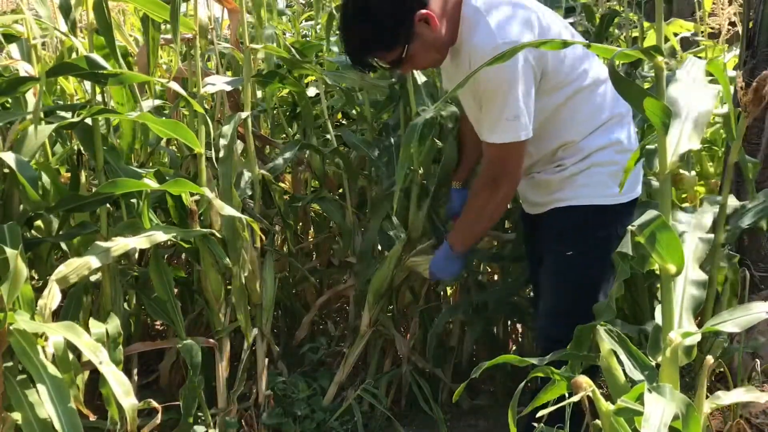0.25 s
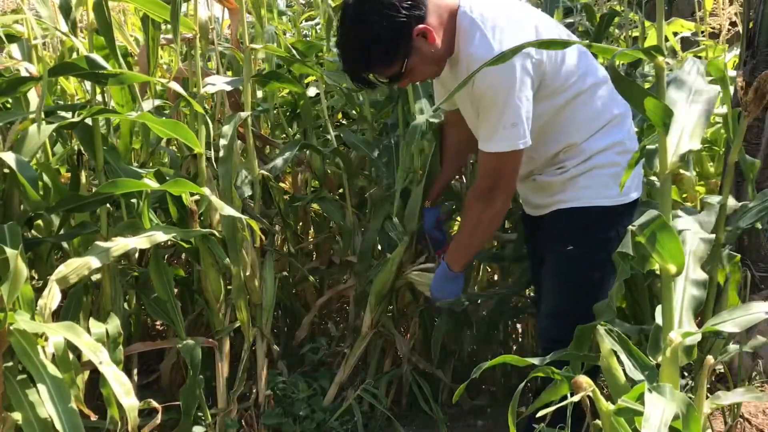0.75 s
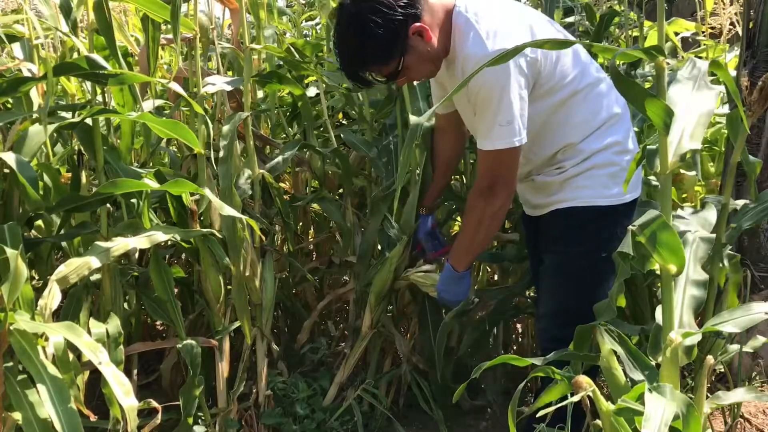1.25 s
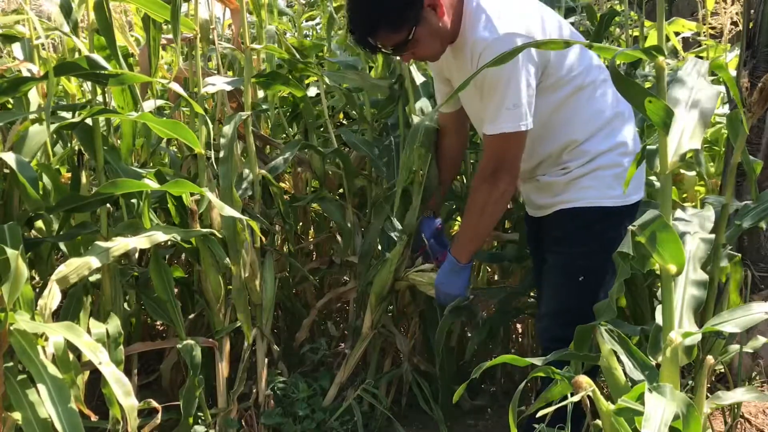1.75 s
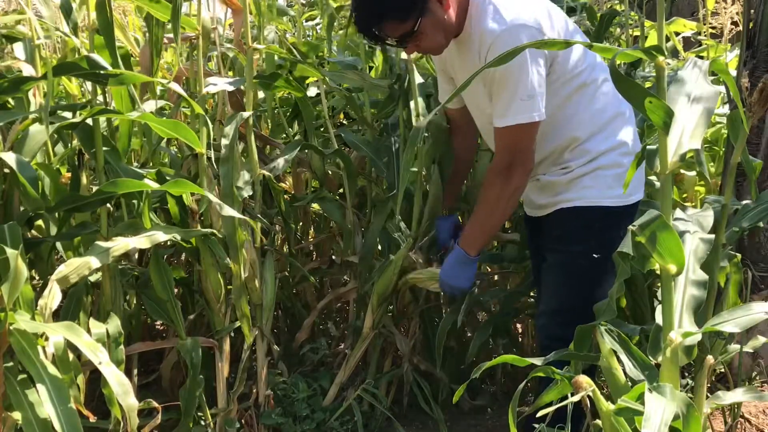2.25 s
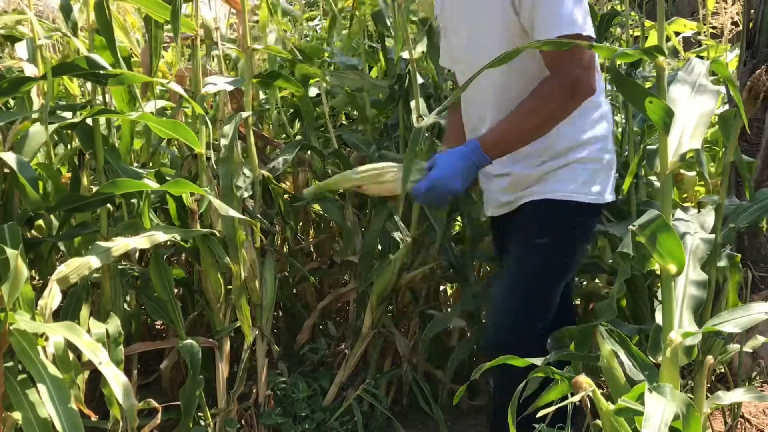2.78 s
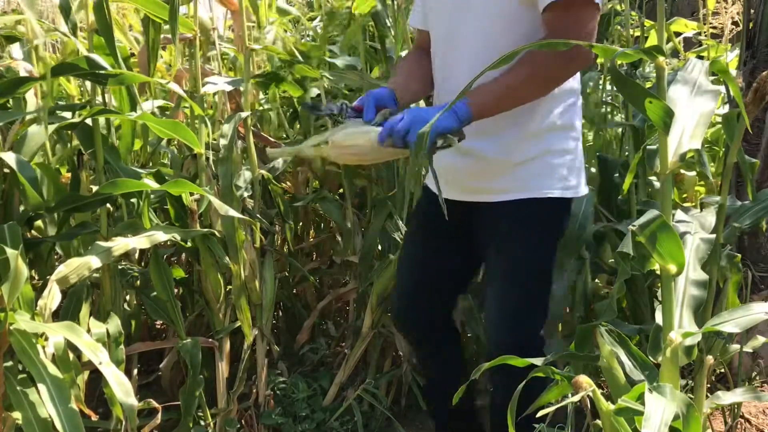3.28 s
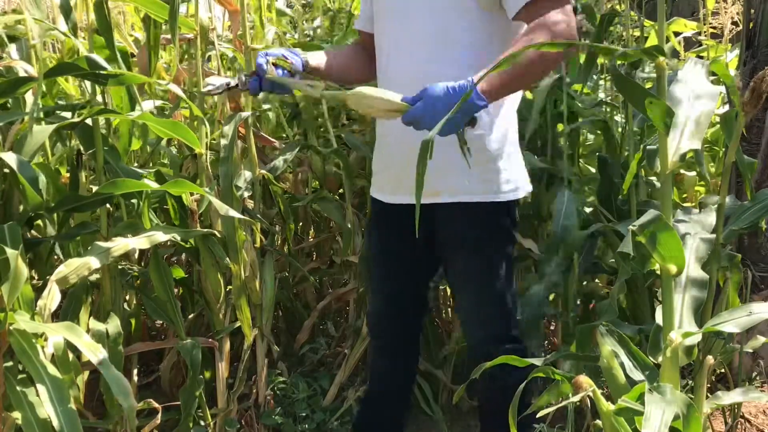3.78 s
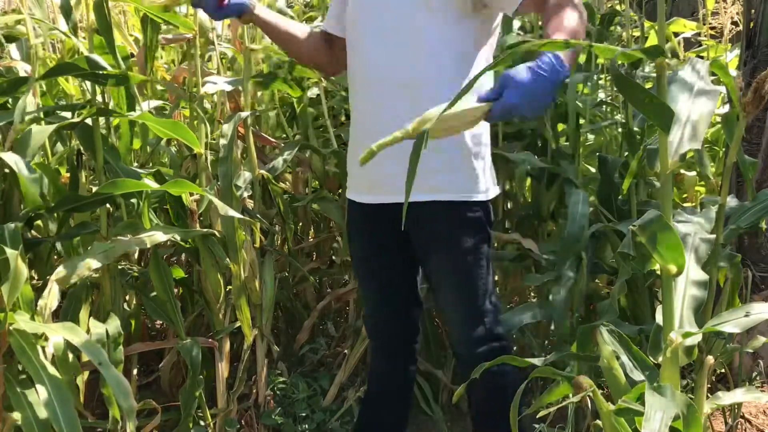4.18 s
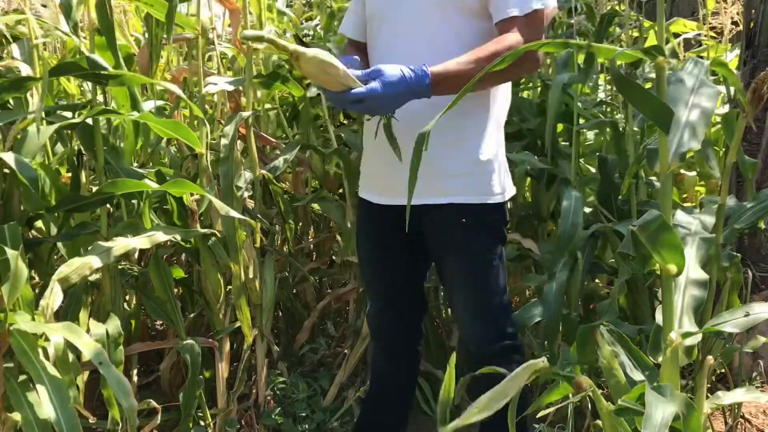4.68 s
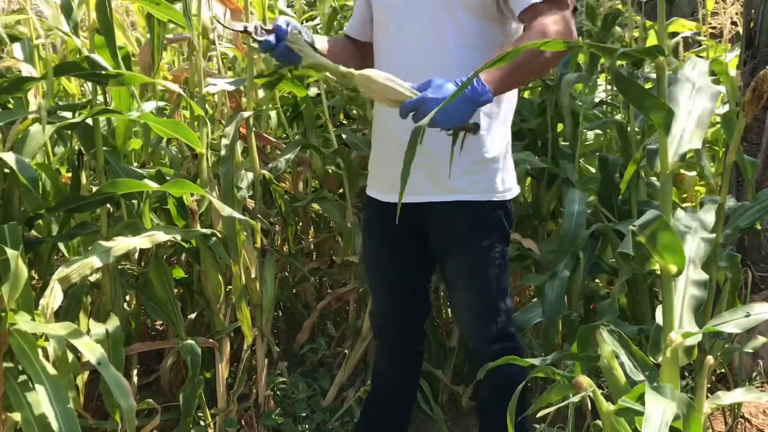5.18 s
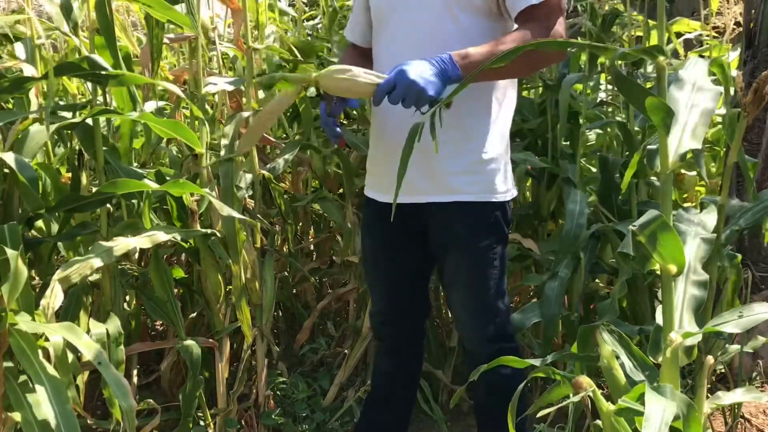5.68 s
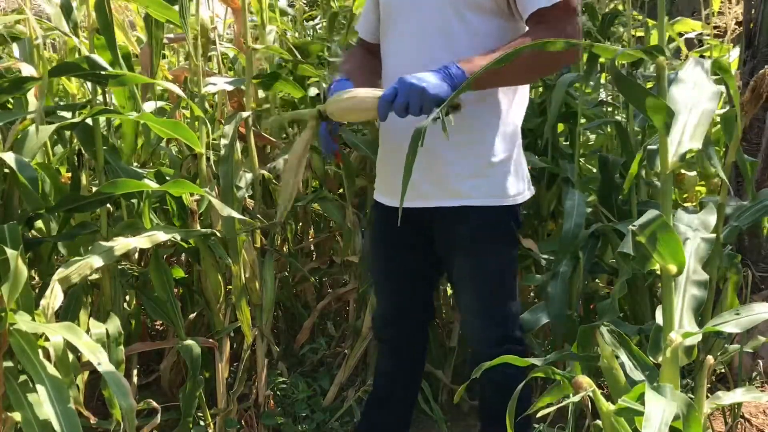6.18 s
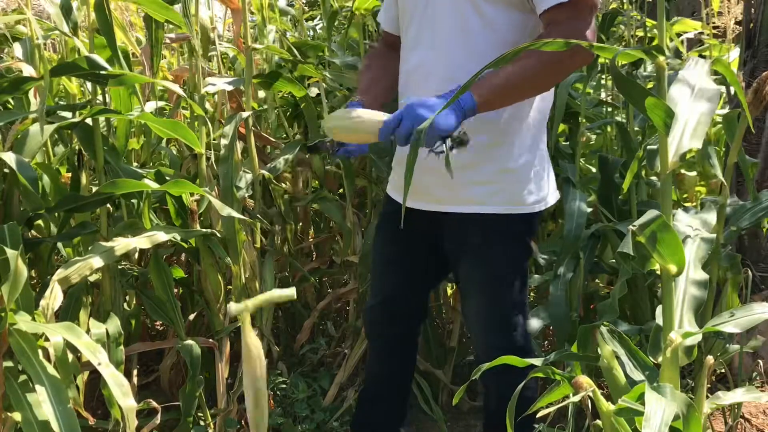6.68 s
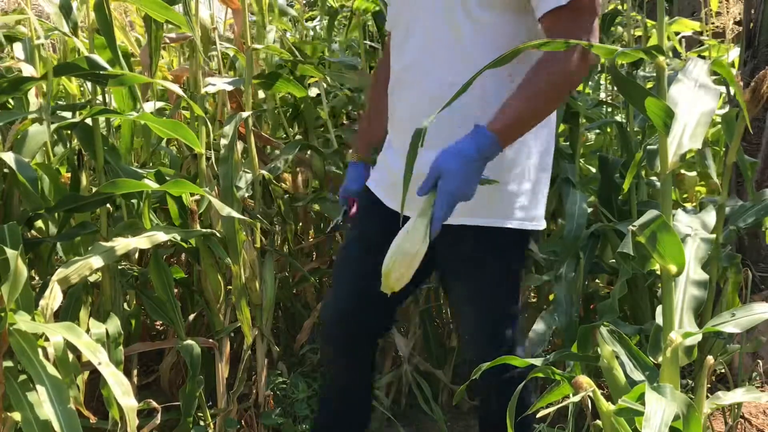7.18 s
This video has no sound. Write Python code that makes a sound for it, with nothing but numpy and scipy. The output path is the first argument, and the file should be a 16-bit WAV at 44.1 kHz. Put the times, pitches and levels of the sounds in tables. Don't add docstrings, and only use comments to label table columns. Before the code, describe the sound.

In a dense corn patch, dry leaves rustle and snap close by as someone works a stalk. Shears cut with a bright ringing snip around two seconds, then husk is pulled with crackles and small squeaks. A duller snip near five seconds and a hard clap at six and a half follow. Far engines hum low and swell late. Mono outdoor pickup, little echo, treble cut off at the very top.

```python
import sys
import numpy as np
from scipy import signal
from scipy.fft import rfft, irfft, next_fast_len
from scipy.io import wavfile
from scipy.ndimage import uniform_filter1d, map_coordinates

SR = 44100
rng = np.random.default_rng(int(sys.argv[2]) if len(sys.argv) > 2 else 0)


def generate_wav(signal):
    frames = np.transpose(np.atleast_2d(signal))
    scaled = np.clip(frames, -1, 1) * 32767
    pcm = np.round(scaled).astype(np.int16)
    wavfile.write(sys.argv[1], SR, pcm)


def rack_gain(trim_db):
    fader = np.asarray(trim_db, float)
    return 10 ** (fader / 20)


N = 328104


def unit(x):
    return x / np.sqrt(np.mean(x ** 2, axis=-1, keepdims=True) + 1e-20)


def along(points, hz):
    f, v = np.transpose(points)
    return np.interp(np.log(hz + 1), np.log(f + 1), v)


def curves(rows):
    s, *cols = np.transpose(rows)
    return [np.interp(np.arange(N) / SR, s, c) for c in cols]


def wobble(knots_per_s):
    knots = rng.standard_normal(int(N * knots_per_s / SR) + 4)
    return map_coordinates(knots, [np.arange(N) * knots_per_s / SR])


def coloured(x, spectrum):
    m = next_fast_len(N + 8192)
    gain = rack_gain(along(spectrum, np.fft.rfftfreq(m, 1 / SR)))
    return unit(irfft(rfft(x, m) * gain, m)[:N])


def patchy(patchy_db, bins, frames):
    z = signal.stft(rng.standard_normal(N), nperseg=256)[2]
    field = uniform_filter1d(rng.standard_normal(z.shape), bins, 0)
    field = uniform_filter1d(field, frames, 1)
    return signal.istft(z * rack_gain(patchy_db * field / field.std()), nperseg=256)[1][:N]


def add(track, s, sound):
    part = track[round(s * SR):][:len(sound)]
    part += sound[:len(part)]


def fibre(x, ring_hz, low_db, high_db, ring_db, q):
    f = np.fft.rfftfreq(len(x), 1 / SR)
    tilt = rack_gain(along([(150, low_db - 25), (300, low_db - 6), (900, low_db), (2600, -1.44), (5800, -0.98),
                      (9500, high_db), (13000, high_db), (16000, high_db - 6)], f))
    damping = 1j * f * ring_hz / q
    ring = damping / (ring_hz ** 2 - f * f + damping)
    z = rfft(x)
    power = abs(z) ** 2
    local_power = np.abs(uniform_filter1d(power, size=len(f) // 24))
    even = z * np.sqrt(np.mean(power) / local_power)
    return irfft(even * tilt * (1 + rack_gain(ring_db) * ring), len(x))


def road():
    # start_s, rumble_db, roar_db
    traffic = [(0.0, -53.5, -61), (5.28, -54, -59.5), (6.34, -50.5, -60.5), (7.07, -51.5, -61),
               (7.44, -53.5, -60)]
    # freq_hz, level_db (per Hz)
    rumble = [(15, -60), (25, -20), (50, -7.5), (65, 2.5), (118, -4), (139, -5.5), (156, -13), (172, -7),
              (257, -14), (400, -23), (520, -29), (880, -120)]
    # freq_hz, level_db (per Hz)
    tyres = [(160, -11.5), (280, -12), (373, -5), (435, -6.5), (813, -2), (1200, -5.5), (1450, -10.5),
             (1740, -11.5), (2280, -18), (12400, -24), (16000, -47)]
    # start_s, firing_hz, level_db
    van = [(2.1, 71.66, -54), (2.6, 73.05, -62), (2.9, 76.1, -55), (3.38, 79.9, -52.5), (3.6, 85.2, -61),
           (3.9, 87.4, -70), (4.35, 95.2, -58.5), (4.7, 99.5, -72), (5.3, 107.5, -60.5)]
    # start_s, firing_hz, level_db
    lorry = [(5.65, 56, -59), (5.85, 61.3, -47.5), (6, 64.7, -44), (6.17, 74.75, -39.5),
             (6.55, 78.53, -39.5), (6.85, 81.75, -45.5), (7.02, 83.7, -47.5), (7.1, 79.3, -56),
             (7.44, 77.66, -53)]
    # start_s, firing_hz, level_db
    car = [(5.35, 72.7, -53), (5.55, 71.8, -53), (5.72, 75, -45.5), (5.85, 81.9, -51), (6, 100.4, -51.5),
           (6.25, 105.7, -53.5), (6.7, 110.3, -53), (7.1, 121.8, -57.5), (7.44, 125.5, -57.5)]
    rumble_db, roar_db = curves(traffic)
    out = rack_gain(rumble_db - 3) * coloured(rng.standard_normal(N), rumble)
    out = out + rack_gain(roar_db - 0.5 + 0.5 * wobble(3.44)) * coloured(patchy(0.78, 5, 30), tyres)
    t = np.arange(N) / SR
    for rows in (van, lorry, car):
        hz, db = curves(rows)
        since_start, to_end = t - rows[0][0] + 0.048, rows[-1][0] + 0.15 - t
        fade = np.clip(np.minimum(since_start, to_end) / 0.14, 0, 1)
        phase = 2 * np.pi * np.cumsum(hz + 0.31 * wobble(5.03)) / SR
        out = out + np.sqrt(2) * fade * rack_gain(db + 0.53 * wobble(7)) * np.sin(phase)
    return out


def drones():
    # loudest_s, half_length_s, pitch_hz, glide_hz_per_s, level_db
    engines = [(0.36, 0.63, 62.5, 2, -59), (1.4, .55, 63.5, 5.5, -57), (2.55, 0.51, 63.3, -0.5, -55.5),
               (0.054, .6, 101, 5.5, -56.5), (0.78, 0.524, 108.5, -3, -58.5), (1.65, 0.67, 107.5, 3.5, -60),
               (5.2, 1.5, 50.5, 4, -61.5), (7.35, 1.06, 56.5, 6.5, -50.5), (6.65, 0.44, 68.5, 4, -47.5),
               (3.057, 8.2, 130.5, 0.36, -68), (3.4, 0.34, 212, -1.5, -63.5), (7.2, .3, 101, -0.5, -53),
               (6.35, 0.402, 126, 15.5, -59), (5.9, 0.25, 186, 9.5, -64)]
    out, t = np.zeros(N), np.arange(N) / SR
    waver_hz, flutter_db = 0.26 * wobble(5.2), wobble(7)
    for s, half_s, hz, glide, db in engines:
        near = np.abs(t - s) < 2 * half_s
        u, shift = t[near] - s, rng.integers(N)
        phase = 2 * np.pi * np.cumsum(hz + glide * u + np.roll(waver_hz, shift)[near]) / SR
        level_db = db - 12 * (u / half_s) ** 2 + np.roll(flutter_db, shift)[near]
        out[near] += np.sqrt(2) * rack_gain(level_db) * np.sin(phase)
    return out


def handling():
    # start_s, rustle_db, body_db (relative)
    sway = [(0.0, -54, -10), (0.25, -55, -4), (.44, -59.5, 0.5), (.94, -59.5, -0.5), (1.56, -70.5, 0),
            (1.92, -65, 0.5), (2.13, -52.5, -8), (2.92, -57.5, -4.5), (3.54, -54.5, -12), (3.98, -62.5, -8),
            (4.46, -67.5, -1.5), (4.85, -59.5, -8), (5.17, -68.5, -1.5), (6.2, -69, -3.5),
            (6.68, -63.5, -3.5), (6.95, -56.5, -6.5), (7.44, -60, -9)]
    # loudest_s, level_db, length_s, body_db (relative)
    brushes = [(0.346, -59, 0.059, 5.5), (0.696, -52.5, 0.12, -1.5), (0.86, -57.5, 0.074, -4),
               (1.03, -53, 0.083, -2.5), (1.337, -60, 0.19, 0), (1.712, -60.5, 0.19, 0),
               (2.055, -44, 0.076, -5), (2.21, -49, 0.15, -8), (2.574, -49.5, 0.23, -13),
               (3.203, -50, 0.047, 0), (3.428, -50.5, 0.12, -1.5), (4.147, -58.5, 0.15, 1),
               (4.34, -55.5, 0.069, -1), (4.778, -54.5, 0.22, 4), (4.964, -53, 0.092, -3),
               (5.248, -61.5, 0.073, 3), (6.386, -59, 0.19, -5), (6.54, -50.5, 0.11, -5.5),
               (6.827, -47.5, 0.063, -11), (7.132, -55.5, 0.081, -7), (7.324, -57, 0.13, -16)]
    fall_db, rise_over_fall = 13.5, 0.81
    sway_db, body_db = curves(sway)
    crisp, body, t = rack_gain(2 * sway_db), rack_gain(2 * (sway_db + body_db)), np.arange(N) / SR
    for s, db, length_s, fuller_db in brushes:
        near = np.abs(t - s) < 4 * length_s
        away = np.where(t[near] < s, (s - t[near]) / rise_over_fall, t[near] - s) / length_s
        power = rack_gain(2 * (db - fall_db * away))
        crisp[near] += power
        body[near] += power * rack_gain(2 * fuller_db)
    return np.sqrt(crisp), np.sqrt(body)


def rustle():
    # freq_hz, level_db (per Hz)
    crisp_spectrum = [(500, -48.5), (2500, -3.5), (5000, 0.5), (8500, -1), (12000, -1.5), (14500, -2),
                      (16000, -3.5)]
    # freq_hz, level_db (per Hz)
    body_spectrum = [(200, -31), (500, -10.5), (1200, -4.5), (2500, -6.5), (4500, -9), (9000, -20.5)]
    crisp_gain, body_gain = handling()
    swell_db = 0.71 * wobble(40) + 0.78 * wobble(150)
    size_db = np.minimum(4 * rng.exponential(size=N), 14)
    cracks = (rng.random(N) < 900 / SR) * rng.standard_normal(N) * rack_gain(size_db)
    cracks = signal.lfilter([1], [1, -.3], cracks)
    tail = rng.standard_normal(160) * rack_gain(-60 * np.arange(160) / SR / 0.0037)
    cracks = unit(signal.fftconvolve(cracks, tail)[:N])

    def rub():
        return patchy(2.65, 8, 3) + rack_gain(-12.5) * cracks

    crisp = crisp_gain * coloured(rub(), crisp_spectrum)
    body = body_gain * coloured(rub(), body_spectrum)
    return rack_gain(swell_db) * (crisp + body)


def snaps():
    # start_s, peak_db, ring_hz, high_db
    leaf = [(0.0874, -31.5, 5370, -15), (0.1765, -27, 11000, -9), (0.2305, -19.5, 5200, -14),
            (0.2496, -26, 5000, -12), (0.251, -16, 5400, -12.5), (0.2533, -22, 5500, -8),
            (0.278, -21, 5420, -15), (0.3022, -14.5, 5400, -16.5), (0.6075, -19.5, 3280, -16),
            (0.8332, -25, 6910, -13), (1.9461, -18, 3790, -25), (2.0117, -24, 6490, -8),
            (2.034, -21, 7040, -15), (2.3725, -28, 2310, -13.5), (3.2847, -32, 8870, -14),
            (3.3537, -29, 14000, -13), (6.8115, -31, 8530, -10), (3.928, -34, 6500, -11.5),
            (6.321, -30, 3690, -11), (6.8156, -17.5, 11590, -11), (7.2245, -32, 7120, -10),
            (7.3697, -36, 6000, -6)]
    # start_s, peak_db, ring_hz, high_db
    husk = [(0.1945, -28.5, 3670, -7), (0.27, -26, 3440, -10), (0.3258, -11.5, 5380, -12.5),
            (0.3623, -18.5, 3280, -15.5), (0.6399, -32, 3000, -11), (0.699, -35, 4500, -20),
            (0.7894, -23, 2560, -10), (0.826, -22, 3560, -10.5), (1.9664, -24.5, 6410, -13),
            (2.5, -30.5, 8750, -18), (3.0799, -36, 1630, -19), (4.955, -20.5, 6520, -16),
            (4.9626, -30, 6200, -12), (4.9697, -21.5, 3000, -17), (4.997, -21, 4000, -15),
            (5.0015, -31, 3000, -14), (5.0105, -33, 4500, -10), (5.7448, -42, 1550, -12),
            (6.362, -26.5, 3290, -19), (6.3445, -39, 6000, -12), (6.5704, -35, 11800, -7),
            (6.385, -36, 2170, -12), (6.8992, -28.5, 3310, -28), (4.879, -31, 12000, -10),
            (2.1015, -29, 6260, -20), (2.1125, -34, 6300, -24)]
    # start_s, peak_db, ring_hz, high_db
    stalk = [(1.039, -27.5, 5480, -12.5), (1.643, -38, 1575, -5), (2.0502, -12.5, 3610, -6),
             (4.0438, -19.5, 6880, -17), (4.1029, -33, 2000, -19), (4.6409, -27, 3140, -14.5),
             (4.0462, -23, 7400, -17.5), (6.5088, -12.5, 3170, -11.5), (4.932, -29.5, 2400, -15),
             (6.4124, -36, 2590, -16), (6.5779, -29.5, 1580, -6), (6.6444, -35, 2036, -14),
             (6.6752, -30.5, 8600, -18), (6.775, -34, 2840, -20), (7.1836, -35.5, 2013, -17),
             (7.2, -30.5, 8500, -13)]
    # start_s, peak_db, ring_hz, high_db
    ticks = [(0.7507, -37, 3780, -20), (3.2256, -31, 8550, -10), (3.4471, -29.5, 3950, -10.5),
             (3.485, -26.5, 13800, -11), (3.5064, -28, 6270, -7), (3.5384, -46, 8300, -8),
             (3.7837, -38, 4570, -11.5), (3.8312, -37, 4660, -8), (3.8454, -38, 11700, -10),
             (3.8544, -38, 4160, -8), (3.9184, -45, 4450, -8), (3.9217, -35, 4380, -14),
             (3.936, -40, 6010, -14), (6.2826, -40, 2840, -11), (6.3404, -39, 2890, -8),
             (6.3794, -38, 2510, -16), (6.4023, -36, 6230, -9), (6.4214, -37.5, 5150, -8),
             (6.4318, -33, 6190, -10), (6.4474, -43, 10920, -8), (6.4662, -39, 6220, -8),
             (6.8554, -39, 11100, -7), (6.8624, -34, 13200, -3.5), (6.9034, -32.5, 3840, -2),
             (3.566, -37, 11000, -8), (3.5899, -37, 6020, -8), (3.623, -35, 11200, -14),
                  (3.67, -32, 4110, -13), (3.6945, -36, 6060, -12.5), (3.7346, -46, 4040, -8),
                  (3.7928, -36.5, 4340, -21),
             (0.8954, -39, 2900, -9), (1.108, -35, 3380, -10), (1.3428, -39, 4710, -16),
                (1.6142, -48, 2790, -17), (2.78, -31.5, 4270, -13.5), (2.8409, -38, 3120, -12),
                (3.1183, -35, 5370, -15), (3.1344, -29, 5110, -13), (3.1413, -30, 3480, -9),
                (4.1954, -37, 13620, -16), (4.2707, -38, 4100, -13), (4.3296, -38, 6570, -13),
                (4.4983, -44, 7000, -13), (4.6014, -42, 6340, -9), (7.0923, -37, 13240, -9),
                (5.228, -42, 7000, -9), (.3215, -40, 4000, -7), (.17, -32, 12000, -6),
                (3.9625, -43, 11000, -6), (4.005, -39.5, 6000, -9), (4.108, -33, 5500, -13),
                (4.1505, -32, 11000, -4), (4.162, -37, 11500, -8), (4.1678, -37, 7000, -11),
                (4.228, -42, 5000, -16), (7.23, -36, 4500, -15), (6.3645, -27, 12000, -8),
                (7.214, -37, 9000, -12), (7.33, -39, 12000, -6)]
    out, t = np.zeros(N), np.arange(4096) / SR
    lead = 40
    kinds = [(leaf, -28), (husk, -22), (stalk, -16), (ticks, -32)]
    for rows, low_db in kinds:
        for s, db, hz, high_db in rows:
            t60_s = 0.0092 * rack_gain(0.35 * (db + 21.5))
            crack = rng.standard_normal(len(t)) * rack_gain(-60 * t / t60_s)
            spike_db = np.clip(15 + .55 * (db + 20), 7, 16)
            crack[:2] += rack_gain(spike_db) * np.array([1, -.8])
            soil = rack_gain(-13.5) * np.roll(crack * (t < .08), round(.0017 * SR))
            scatter = rack_gain(-11 - 60 * t / 0.052) * rng.standard_normal(len(t)) * (t < .085)
            burst = np.roll(crack + soil + scatter, lead)
            burst = fibre(burst, hz, low_db + 17, high_db + 10.5, ring_db=3, q=5.8)
            add(out, s + 0.001088 - lead / SR, rack_gain(db - 1.26) * burst / np.abs(burst).max())
    return out


def thumps():
    # start_s, peak_db, pitch_hz, t60_s
    knocks = [(2.078, -40, 451, .04), (3.485, -37.5, 338, 0.038), (3.52, -42, 400, 0.037),
              (4.11, -44, 326, 0.05), (4.979, -40.5, 291, 0.035), (6.49, -34, 681, .047),
              (6.505, -36.5, 340, 0.042), (6.513, -37, 944, 0.041), (0.232, -36, 3320, .015),
              (0.2524, -26.5, 3370, 0.0111), (0.304, -25.5, 3180, 0.013), (0.326, -25, 3350, .02),
              (0.327, -31, 2720, 0.018), (0.327, -28.5, 4410, 0.026), (0.364, -40, 2745, 0.0092),
              (0.7, -32, 2610, .01), (2.0775, -24.5, 1670, 0.0103), (3.354, -35, 4150, 0.0075),
              (3.7938, -30, 4340, 0.005), (3.929, -31.5, 4400, 0.0052), (4.0395, -31, 1360, 0.018),
              (4.0464, -33, 1740, 0.021), (4.0615, -30, 4420, .025), (4.063, -33, 1320, .025),
              (4.271, -42, 1800, .02), (4.6415, -27.5, 2370, 0.0075), (4.646, -45, 1043, .03),
              (4.971, -28, 2500, 0.0109), (4.98, -32, 1758, 0.021), (6.386, -42.5, 2310, .01),
              (6.5162, -27, 2380, 0.026), (6.535, -39, 6180, .02), (2.0829, -15.5, 6300, 0.014),
              (.3272, -26, 5380, .022), (6.5153, -22, 7760, .014), (4.9803, -26, 1880, .01),
              (6.9, -27, 2500, 0.0083), (3.5, -48, 440, 0.045), (6.494, -35, 987, 0.031),
              (2.0592, -27, 2160, .01), (2.0595, -28, 6900, .01), (3.61, -44, 1310, 0.014),
              (3.846, -45, 1310, 0.011), (3.444, -41, 2000, .015), (4.963, -37, 6200, .01)]
    out, t = np.zeros(N), np.arange(3000) / SR
    for s, db, hz, t60_s in knocks:
        rise = 1 - np.exp(-t * hz / 0.7)
        add(out, s, rack_gain(db - 60 * t / t60_s) * rise * np.sin(2 * np.pi * hz * t))
    return out


def tears():
    # start_s, length_s, level_db, ring_hz, low_db
    cut = [(1.992, 0.0195, -44.5, 4430, -8), (2.008, 0.047, -43, 4500, -4.5), (2.016, .022, -38, 12000, -8),
           (2.0472, .004, -29.5, 8500, -12), (2.0735, 0.0036, -36, 12000, -9),
           (2.0575, 0.004, -27, 4500, -1), (2.066, 0.026, -36, 2440, 7), (2.078, 0.003, -28, 7000, -11),
           (2.0208, .003, -33, 1700, -3), (2.082, 0.0049, -23, 12900, -12), (2.082, 0.028, -46, 6200, -4.5),
           (4.03, 0.008, -51, 8000, -10), (4.0388, 0.014, -29, 7550, -4), (4.041, 0.011, -35, 14100, -14),
           (4.0585, 0.0091, -30.5, 4300, 4.5), (4.958, 0.013, -38.5, 2180, 2),
           (4.973, 0.019, -30.5, 1800, 0.5), (4.993, 0.031, -42.5, 2470, 3),
           (6.479, 0.0029, -44, 11900, 13), (6.484, 0.0194, -35, 2420, 0.5),
           (6.498, 0.012, -31, 6500, -1.5), (6.5105, 0.0042, -29, 6000, -4),
           (6.5165, 0.0071, -27, 12600, -14), (6.525, 0.028, -45, 6200, -2), (6.488, .012, -41, 6100, -6)]
    # start_s, length_s, level_db, ring_hz, low_db
    pull = [(0.241, 0.024, -54.5, 4000, 1), (0.669, 0.018, -48, 3000, -7), (0.699, 0.0194, -47, 3000, 3),
            (.845, 0.013, -43.5, 3000, 5.5), (0.977, .03, -47.5, 3000, -6), (2.163, 0.071, -45, 4000, -16),
            (2.208, 0.0438, -40.5, 4000, -17), (2.489, 0.096, -42.5, 12500, -3),
            (3.075, 0.036, -49.5, 1610, 6), (3.132, 0.05, -39.5, 2000, -2), (3.225, 0.039, -41, 2000, -3),
            (3.426, 0.0403, -46, 3280, 8), (3.498, 0.029, -50, 5010, 4.5), (4.106, 0.031, -44, 3900, 8),
            (4.151, 0.0215, -43.5, 2680, 2), (4.269, 0.02, -45.5, 4000, 0), (4.334, 0.018, -56, 3864, 7.5),
            (4.872, 0.014, -44, 9000, 3), (5.2475, .01, -55, 3200, -2), (5.259, .008, -51, 2600, -1),
            (5.2635, 0.014, -47, 6540, -10), (5.296, 0.016, -46, 7140, -12), (5.3045, .007, -44, 4300, -16),
            (3.243, .02, -47, 12800, -10), (6.81, 0.02, -42, 12520, 0), (7.09, 0.033, -46.5, 12000, 0)]
    out, t = np.zeros(N), np.arange(8192) / SR
    for rows, base_high_db in [(cut, -2.5), (pull, -2)]:
        for s, length_s, db, hz, low_db in rows:
            high_db = base_high_db + 0.064 * low_db
            u = t / length_s
            fall = np.exp(-u ** 2.12 * 1.42) + rack_gain(-7) * np.exp(-t / 0.014)
            shape = (1 - np.exp(-u / 0.1783)) * fall
            lumps = rack_gain(3.2 * map_coordinates(rng.standard_normal(400), [t * 1700]))
            crackle = unit(lumps * rng.standard_normal(len(t))) * shape * (t < .17)
            add(out, s, rack_gain(db) * fibre(crackle, hz, low_db, high_db, ring_db=5, q=6))
    return out


def shears():
    # start_s, crack_db, ring_db
    cuts = [
        (2.0819, -27, 11),
        (6.5148, -22, 1),
        (4.9795, -27, -10),
    ]
    # freq_hz, level_db, t60_s
    blades = [(2240, -11, .015), (5420, -11, .015), (5800, 0, .012), (6180, 5, 0.016), (6120, -27, 0.11),
              (6290, -25, 0.09), (7600, -3, 0.008), (12300, -9, .015)]
    out, t = np.zeros(N), np.arange(4000) / SR
    for s, db, ring_db in cuts:
        ring = np.zeros(len(t))
        for hz, level_db, t60_s in blades:
            ring += rack_gain(level_db + rng.normal(0, 1.2) - 60 * t / t60_s) * np.sin(2 * np.pi * hz * t)
        chatter = rack_gain(-30 - 60 * t / .06) * rng.standard_normal(len(t))
        chatter[0] = 1
        ring = rack_gain(ring_db - 4) * signal.fftconvolve(ring, chatter)[:len(t)]
        crack = rack_gain(-1 - 60 * t / 0.029) * rng.standard_normal(len(t))
        crack[:3] += [.5, -1, .5]
        add(out, s, rack_gain(db) * (ring + 0.85 * np.gradient(crack) + 0.92 * crack))
    return out


def squeaks():
    # start_s, length_s, level_db, pitch_hz
    slips = [
        (3.135, .035, -52, 1950),
        (3.2, .055, -56, 1980),
        (4.738, .044, -54.5, 1880),
        (4.776, .022, -51.5, 1700),
        (4.794, .028, -50.5, 1830),
        (4.824, .014, -55, 1820),
        (4.7, .014, -61, 1900),
        (3.415, .09, -62, 8400),
    ]
    out = np.zeros(N)
    for s, length_s, db, hz in slips:
        n = int(length_s * SR)
        band = signal.butter(2, [hz * 0.955, hz * 1.045], "bandpass", fs=SR, output="sos")
        rough = unit(signal.sosfilt(band, rng.standard_normal(n)))
        add(out, s, rack_gain(db + 2 * wobble(106)[:n]) * rough * np.hanning(n) ** 0.5)
    return out


def scene():
    beyond = road() + drones()
    plants = rustle() + snaps() + thumps() + tears() + squeaks()
    return (beyond + plants + shears())[None]


def roll_off(x):
    return signal.sosfilt(signal.butter(12, 16830, fs=SR, output="sos"), x)


def record(dry):
    # freq_hz, gain_db
    edge = [(15700, 0), (15900, -38), (16700, -42), (16900, -120)]
    # freq_hz, width_hz, gain_db
    port = [(4950, 310, -2), (7560, 320, -3), (10470, 560, -4)]
    m = next_fast_len(N + 8192)
    f = np.fft.rfftfreq(m, 1 / SR)
    colour_db = along(edge, f)
    for hz, width_hz, db in port:
        colour_db = colour_db + db * np.exp(-((f - hz) / width_hz) ** 2)
    mix = irfft(rfft(dry, m) * rack_gain(colour_db), m)[:, :N]
    return roll_off(mix)


dry = scene()
out = record(dry)
generate_wav(out)
```